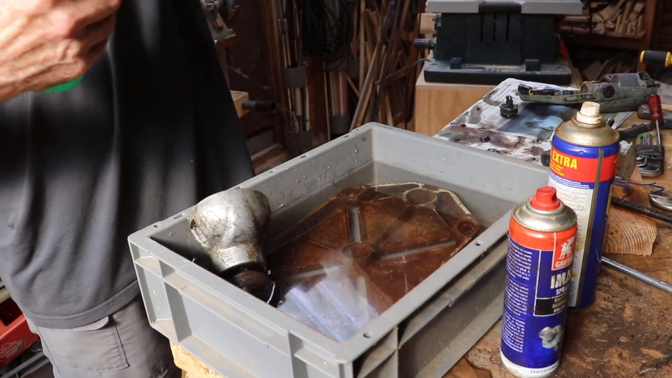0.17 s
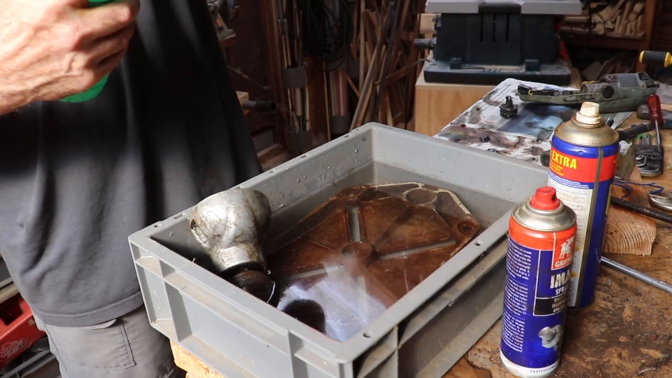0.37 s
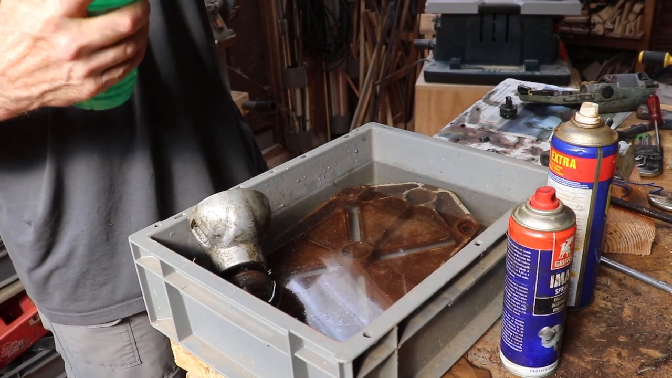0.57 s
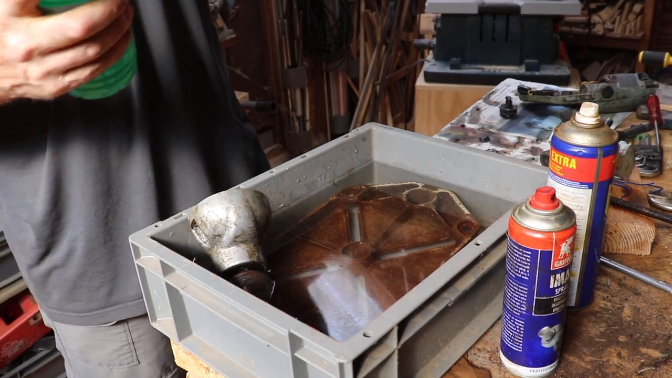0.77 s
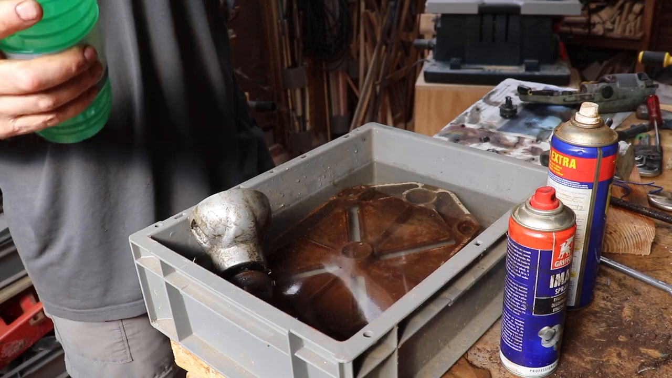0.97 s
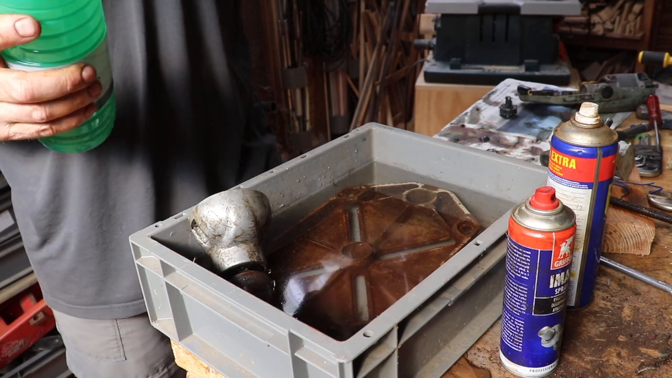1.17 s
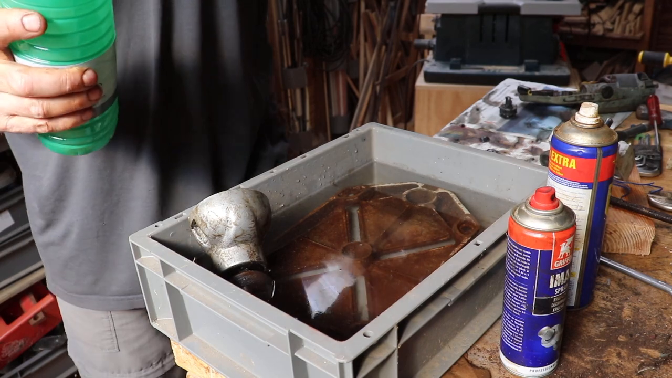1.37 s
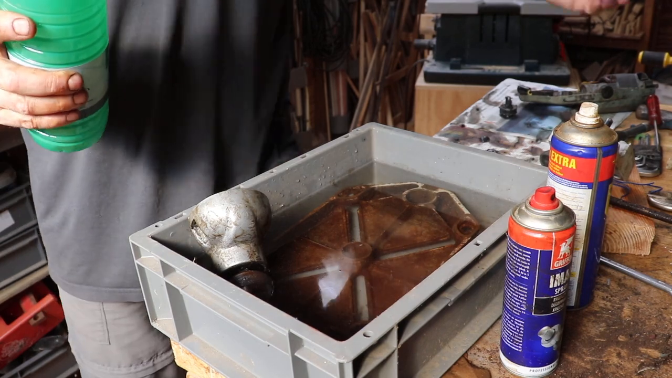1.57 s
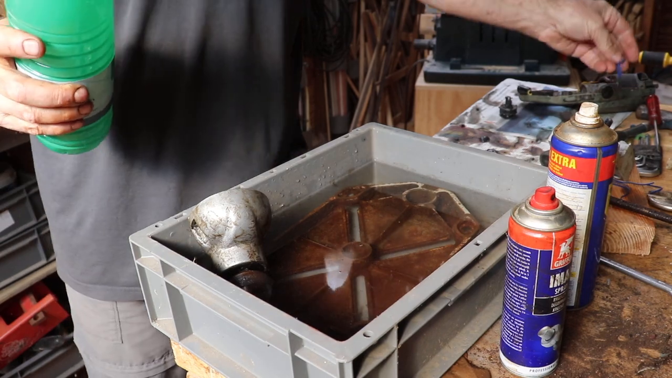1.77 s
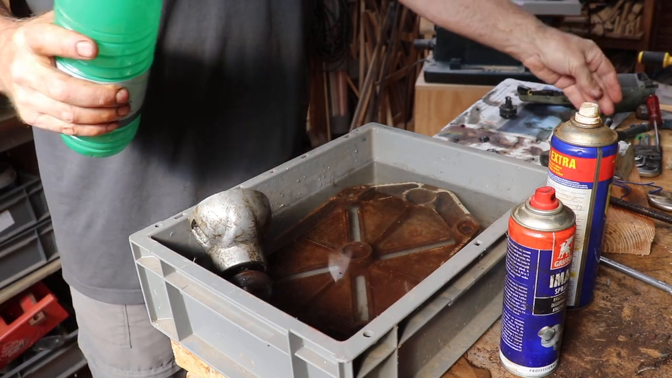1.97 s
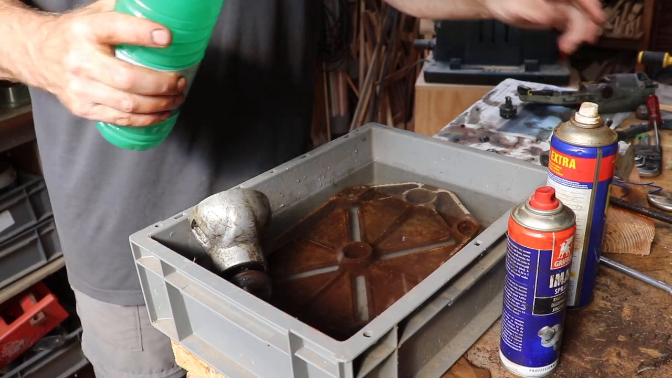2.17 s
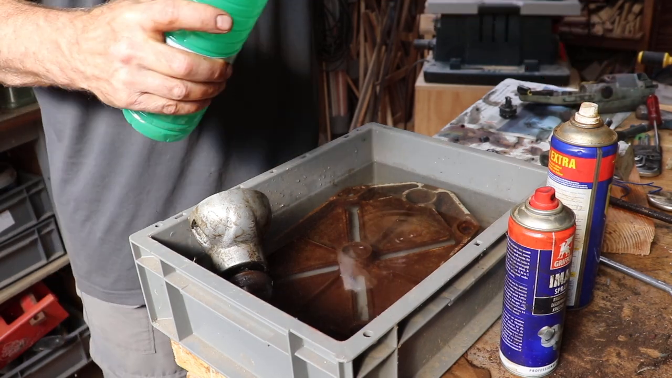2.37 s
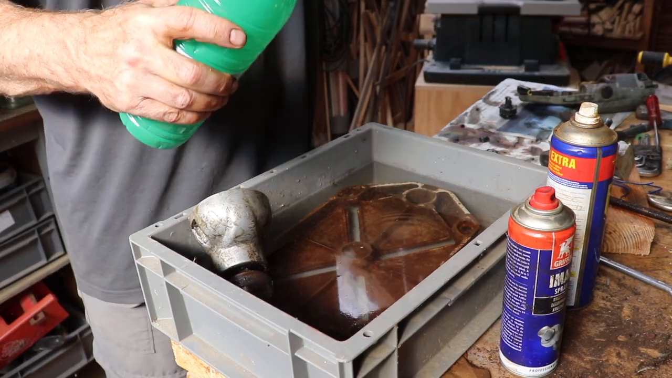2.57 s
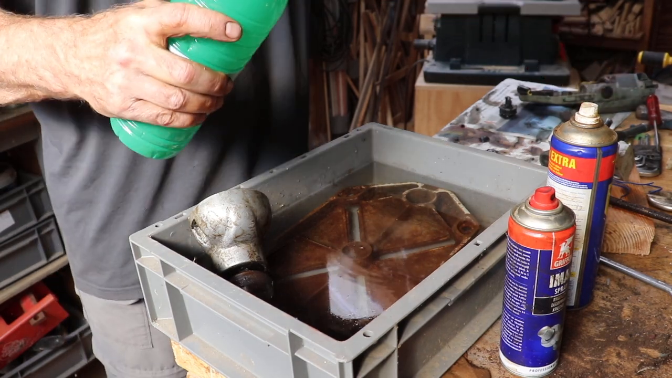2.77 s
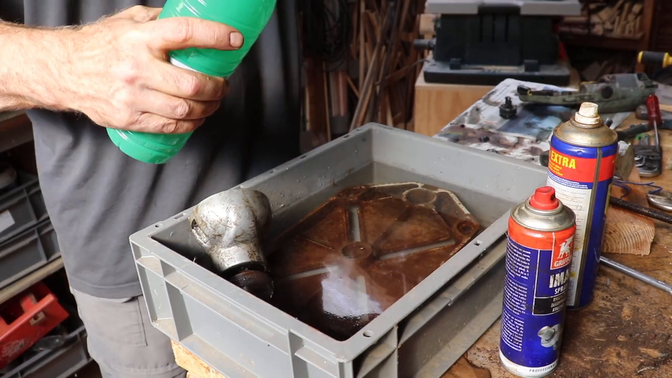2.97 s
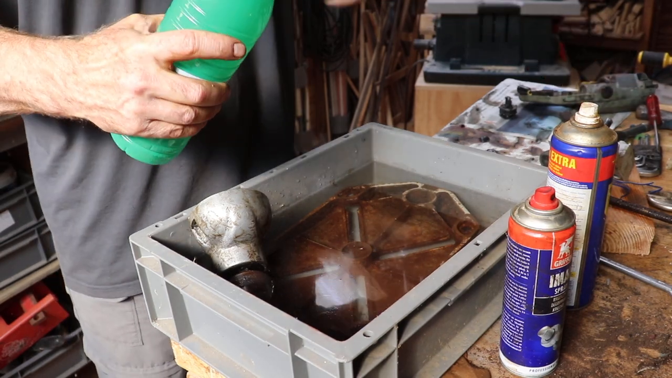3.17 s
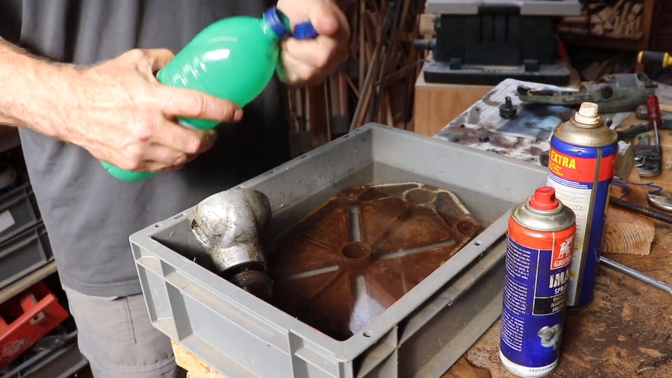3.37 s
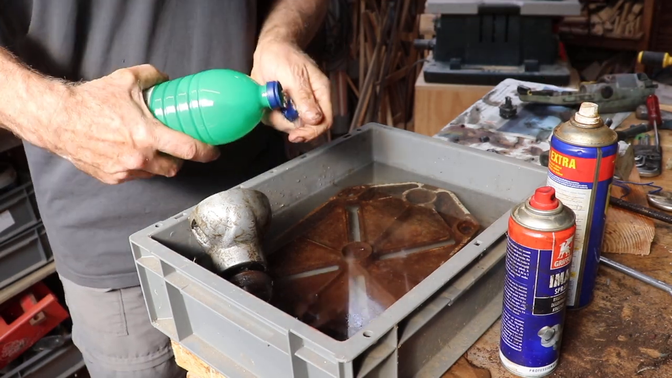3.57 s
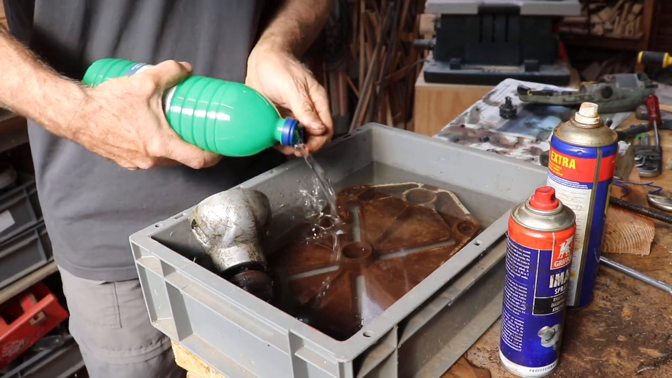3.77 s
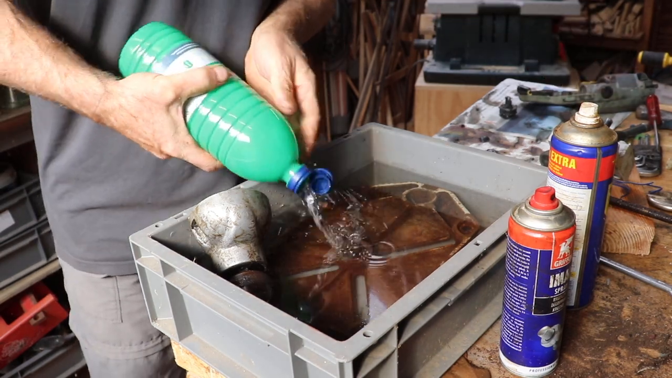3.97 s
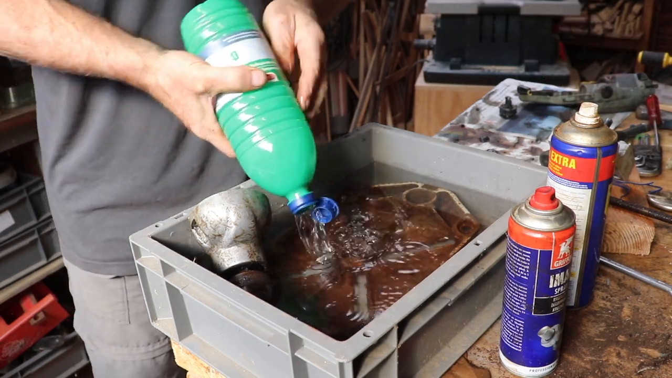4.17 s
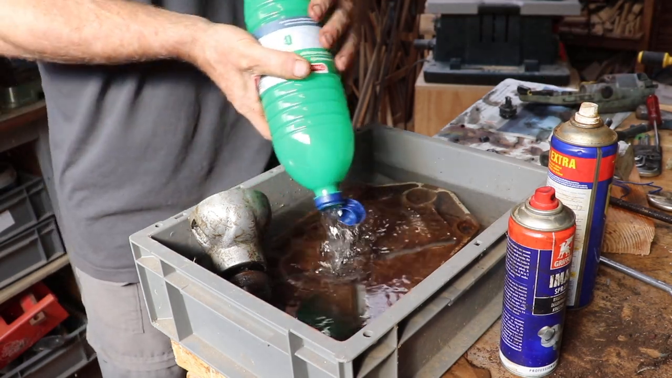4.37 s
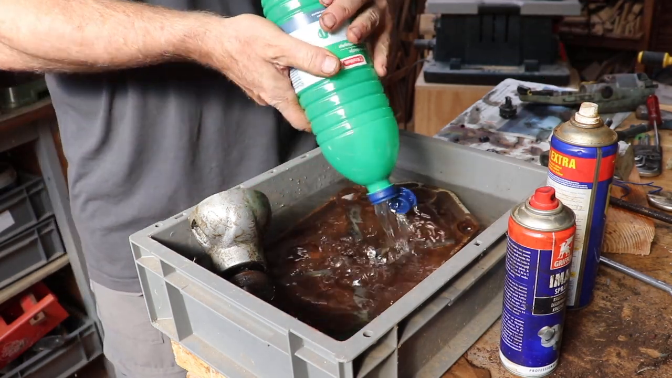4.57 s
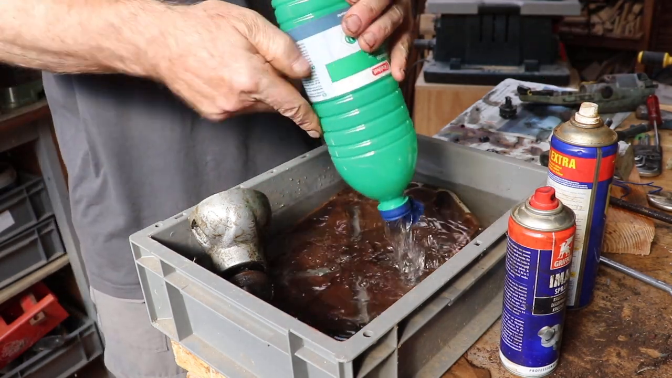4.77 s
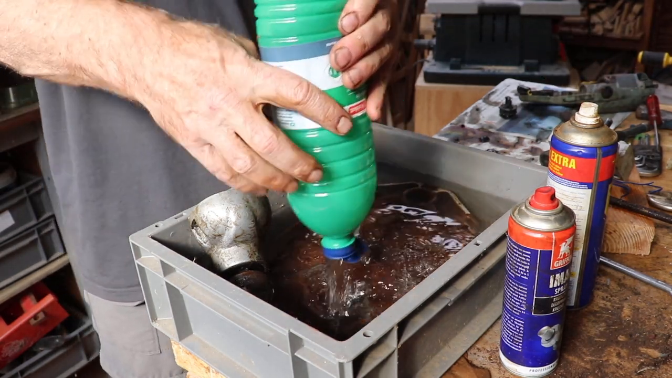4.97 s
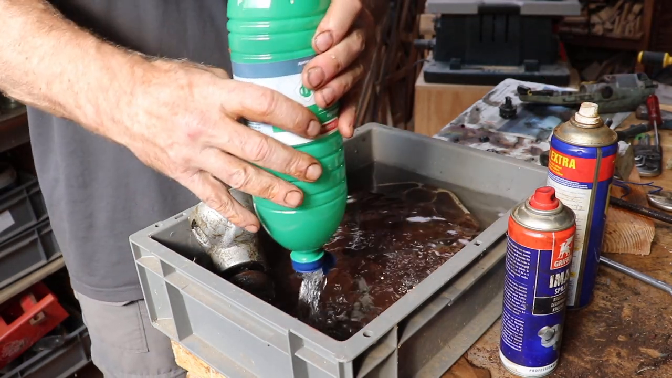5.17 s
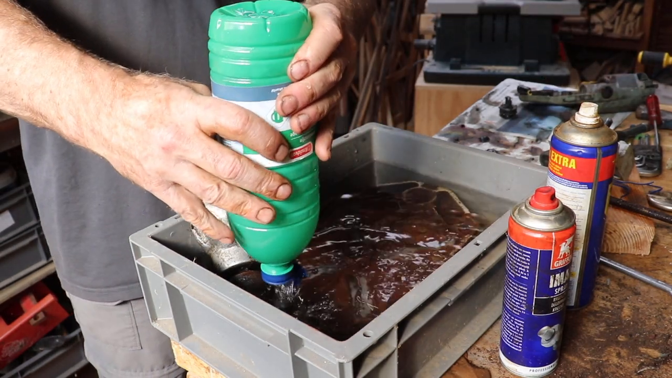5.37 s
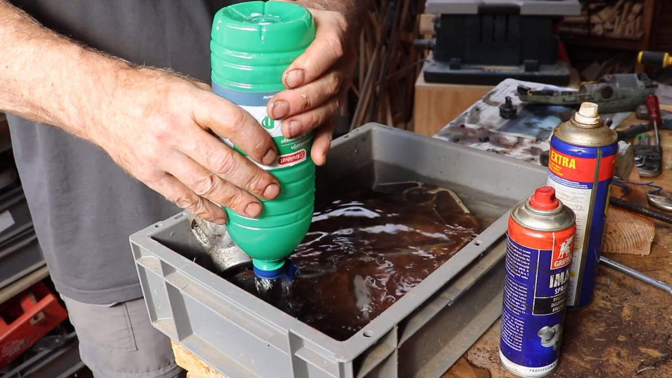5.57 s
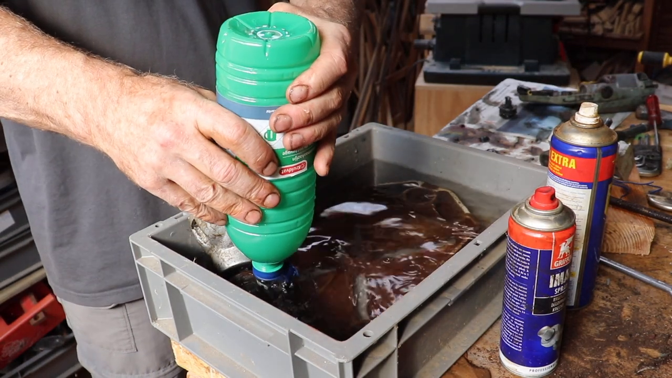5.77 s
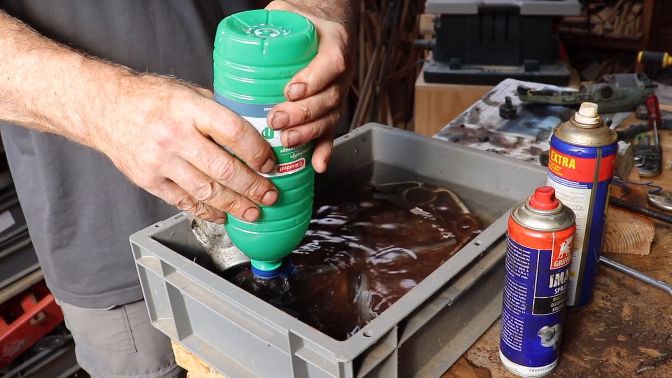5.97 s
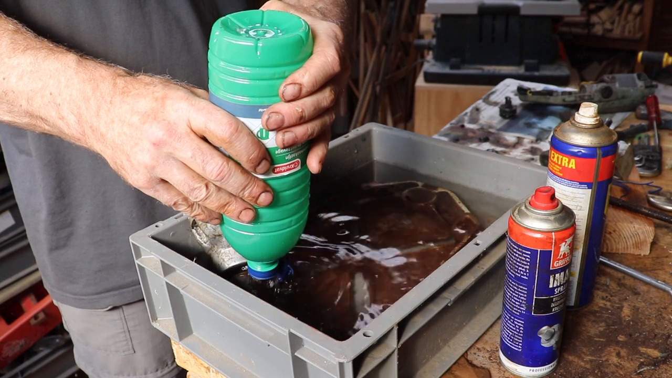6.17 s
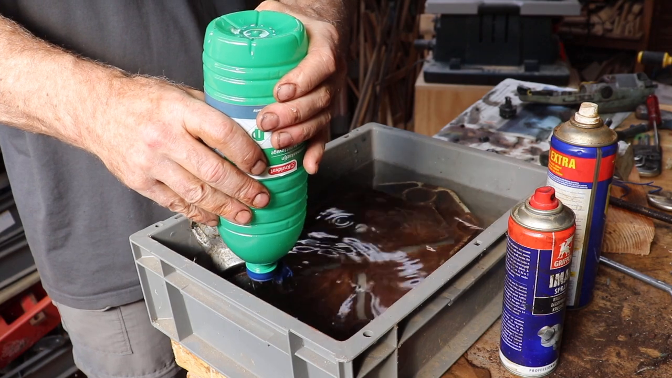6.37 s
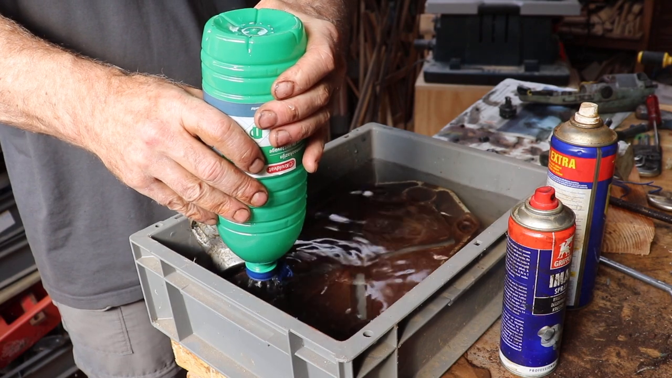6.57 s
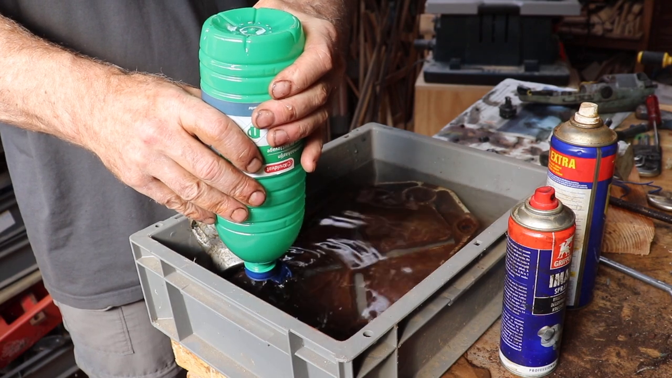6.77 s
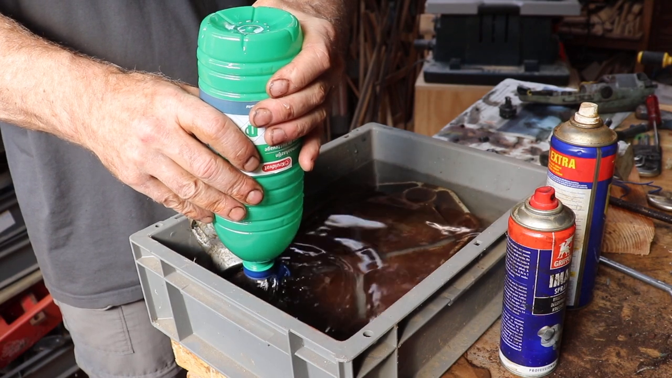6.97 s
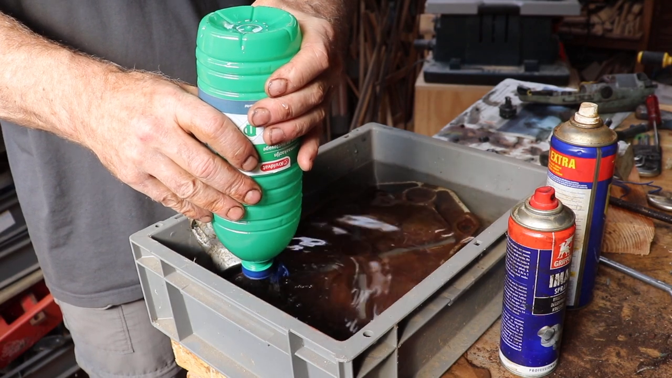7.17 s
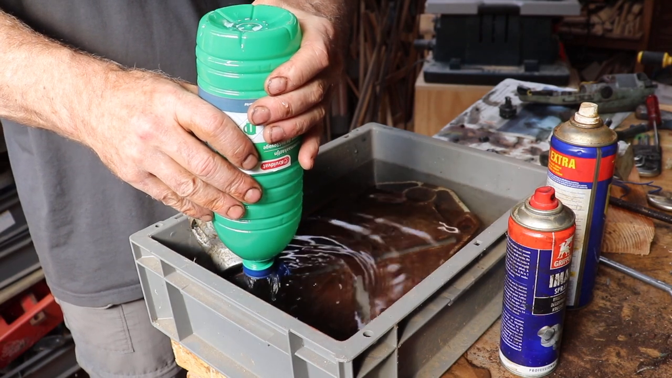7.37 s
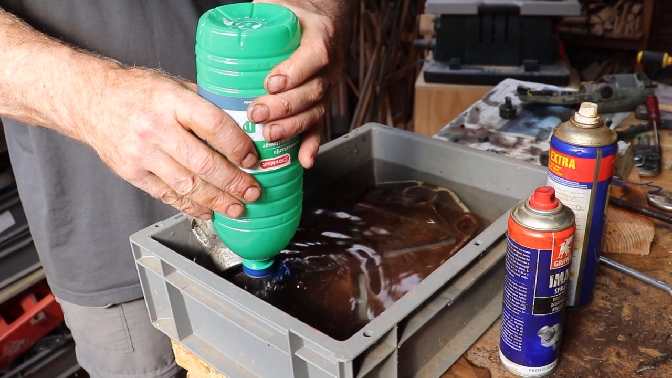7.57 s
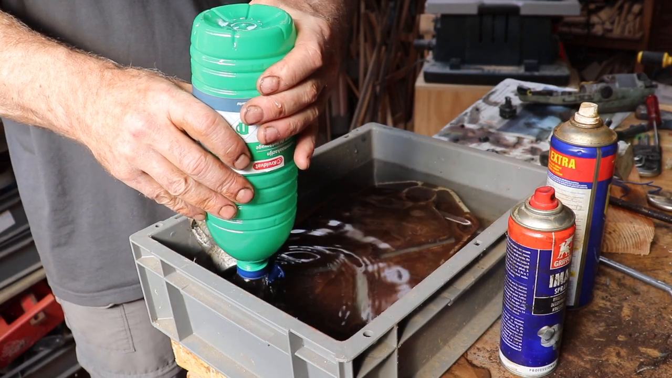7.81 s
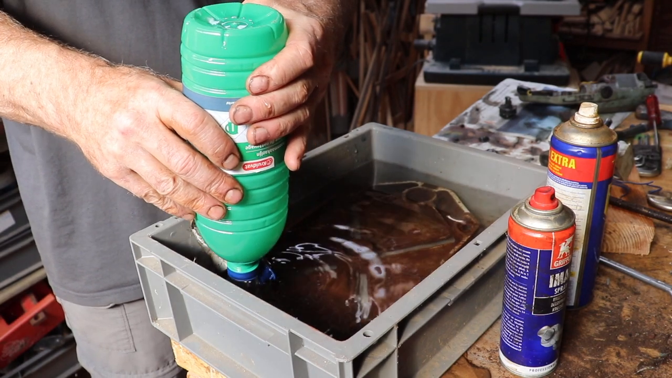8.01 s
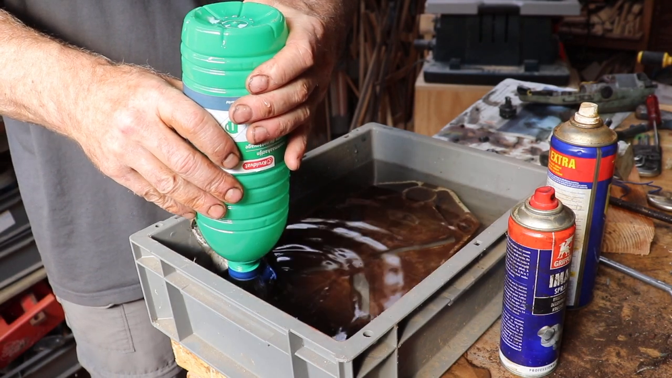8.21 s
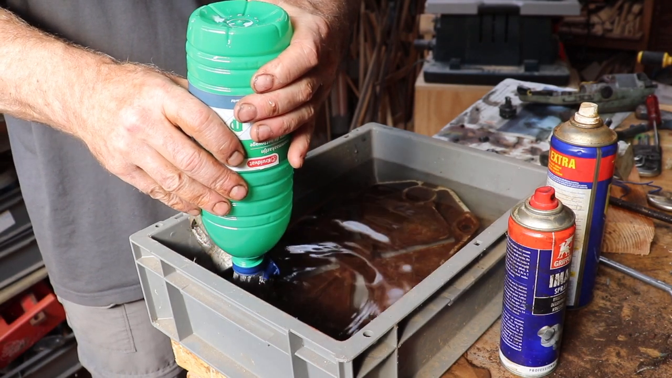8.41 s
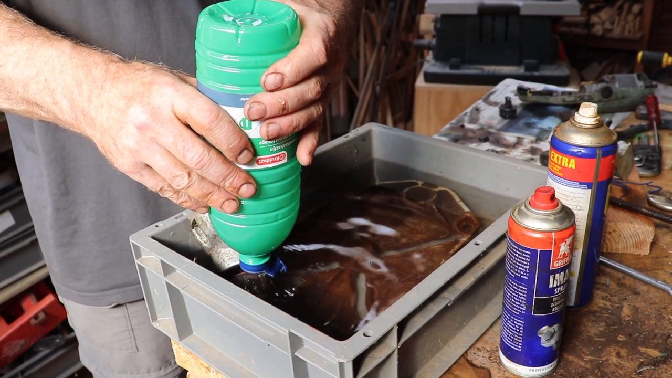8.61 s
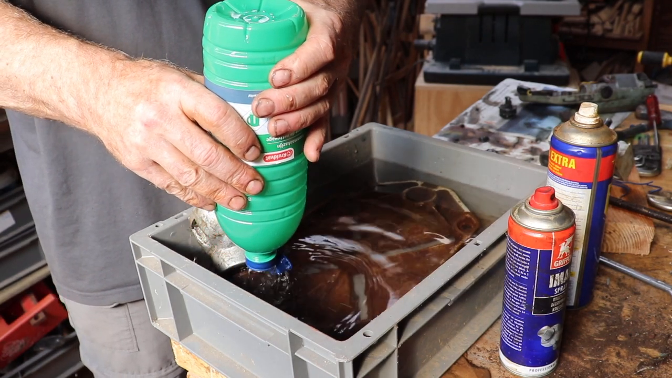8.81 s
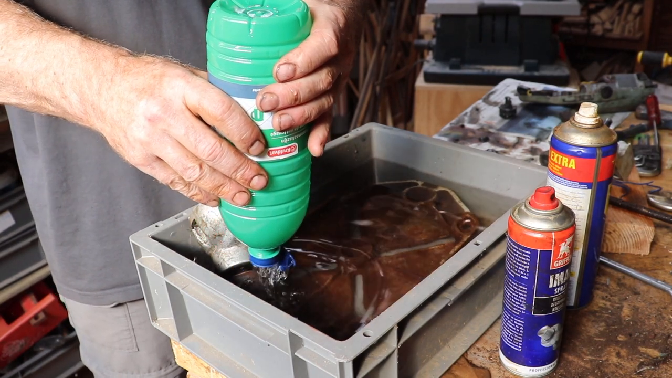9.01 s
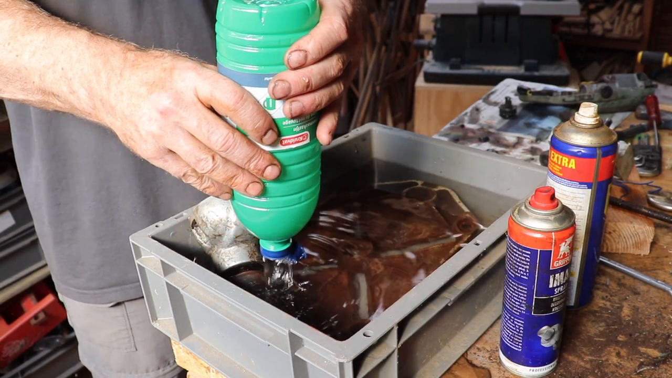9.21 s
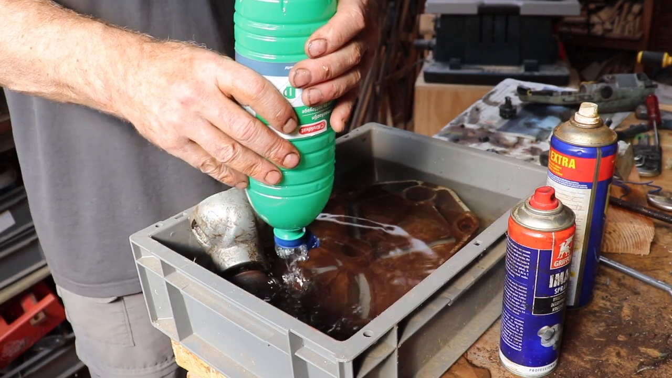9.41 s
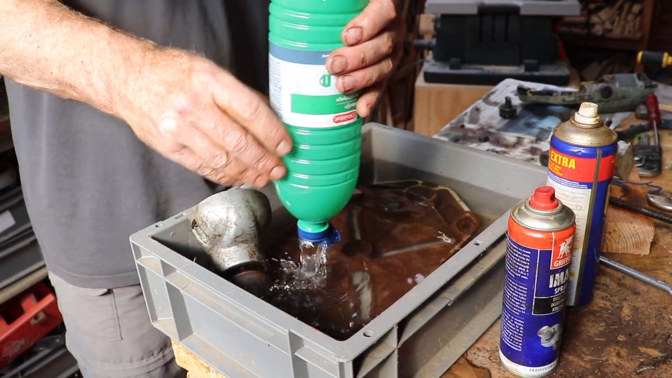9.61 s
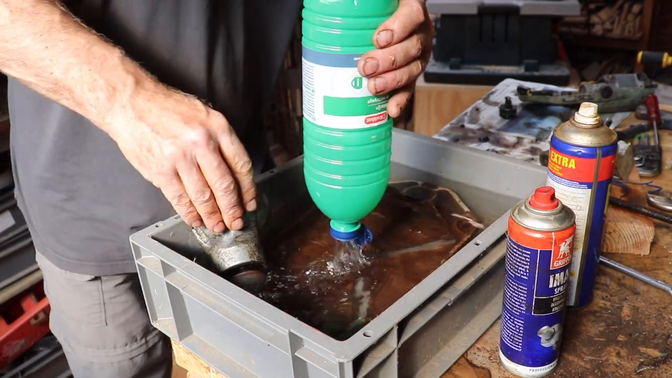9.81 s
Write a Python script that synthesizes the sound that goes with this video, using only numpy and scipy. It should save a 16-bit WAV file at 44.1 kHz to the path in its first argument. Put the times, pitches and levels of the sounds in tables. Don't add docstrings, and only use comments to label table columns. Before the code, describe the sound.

A close stereo microphone in a small workshop with short, quick reflections. From 0 to 1.3 s, feet shuffle softly and fingers rub a plastic bottle, with crisp creaks and clicks around 0.5-0.9 s, over faint air and distant low rumble. Near quiet follows, with slight handling ticks at 1.5-2.8 s. At 3.04 s the cap snaps open, very loud, dry and sharp. Small drips and rubs follow at 3.2-3.8 s. From about 3.8 s liquid pours into a pool in a crate: splashing, splats, fine droplet ticks and crowded bubbles, brightest at 4.2-5.4 s, with irregular hollow low gulps. At 5.75 s the neck strikes a hard part: one loud, bright, very short clack. The gurgling surges near 6.2 s, then becomes quieter and blubbery, thinning around 7.5 s, swelling near 8.2 s, and ebbing again. Splashing strengthens after 9.3 s and is still running at the end, about 9.8 s.

```python
import sys
import numpy as np
from scipy import signal
from scipy.fft import rfft, irfft, next_fast_len
from scipy.io import wavfile
from scipy.ndimage import uniform_filter1d, map_coordinates

SR = 44100
rng = np.random.default_rng(int(sys.argv[2]) if len(sys.argv) > 2 else 0)


def dump_mix(stems):
    frames = np.atleast_2d(stems).T
    limited = np.clip(frames, -1, 1)
    pcm = np.round(limited * 32767).astype(np.int16)
    wavfile.write(sys.argv[1], SR, pcm)


def gain_from_db(level_db):
    decades = np.asarray(level_db, float) / 20
    return 10 ** decades


N = 434385

# time in seconds, level in dB.
RUMBLE_LEVEL = [(0.0, -55), (0.6, -55), (2.0, -60.5), (4.58, -55), (9.85, -62)]
# time in seconds, level in dB.
FEET_LEVEL = [
    (0.0, -49),
    (0.91, -48.5),
    (1.3, -64),
    (3.8, -62),
]
# middle in seconds, half length in seconds, level in dB.
HAND_STROKES = [(0, 0.073, -45), (0.193, 0.26, -48), (0.55, 0.039, -59), (0.668, 0.048, -35.5),
                (1.566, 0.031, -50), (2.185, 0.22, -57.5), (2.57, 0.044, -47), (2.63, 0.07, -41.5),
                (2.729, 0.064, -43), (3.219, 0.024, -39.5), (3.598, 0.019, -44), (3.762, 0.029, -48.5)]
# frequency in Hz, density in dB per Hz.
RUMBLE_COLOUR = [(12, -28), (20, -7.5), (43, 5), (65, -2), (171, -5.5), (200, -5), (260, -33), (440, -120)]
AIR_COLOUR = [(88, 0), (150, -0.5), (385, 2), (496, -2), (679, -3.5), (1520, -9), (7580, -15),
              (15100, -23.5), (16300, -40)]
CLOTH_COLOUR = [(710, -36), (1200, -4), (1910, -13), (2480, 3.5), (3050, -1), (5410, -2.5), (7330, 0.5),
                (15000, -9.5), (16000, -32)]
FEET_COLOUR = [(76, -40), (130, -13), (263, -2), (324, -8), (441, -5), (1800, -17), (2340, -24),
               (3960, -120)]

# frequency in Hz, left-right likeness from 0 to 1.
PORT_LIKENESS = [(40, 0.95), (120, 0.9), (300, 0.93), (700, 0.65), (1500, 0.14), (4000, 0.015)]
# frequency in Hz, 60 dB decay time in seconds.
SHOP_DECAY = [(250, 0.26), (2000, 0.14), (6000, 0.19), (14000, 0.095)]
# delay in seconds, level in dB.
NEAR_ECHOES = [
    (.0013, -13),
    (.0031, -12),
    (.017, -24),
]
# frequency in Hz, left minus right in dB.
PORT_BALANCE = [(60, -3), (300, -0.5), (700, 2), (2400, -2), (8000, .5), (15000, 2.5)]

# start in seconds, peak in dB, thud in dB, snap in dB, left minus right in dB.
PLASTIC_CLICKS = [(0.453, -55, 27.5, 22.5, 3), (0.478, -31, -35, 0.5, 4), (0.603, -26.5, -21, -10, 4),
                  (0.644, -21.5, -11.5, 8, 1), (0.687, -29, -22, -20, 4), (0.914, -29, -13, -13, 7),
                  (1.545, -52, 13.5, -20, 6), (1.99, -57, 11, -20, 10), (2.565, -49.5, -20, 16, 1),
                  (2.801, -38, 18.5, -7, 3), (3.0377, -1, -24, -11, 0.5), (5.7525, -8, -22, -3.5, 1)]
# frequency in Hz, width in Hz, level in dB.
SHELL_MODES = [(800, 940, -6.5), (1680, 390, 3), (2260, 570, 3.5), (3020, 600, 1), (3800, 620, -4)]
HOLLOW_MODES = [(204, 320, -3), (340, 180, 3.5), (970, 450, 1), (2900, 16000, -11)]

# time in seconds, level in dB.
FLOW_LEVEL = [(3.78, -56.5), (3.97, -32), (4.35, -29), (4.73, -31), (4.92, -33), (5.3, -30.5), (5.6, -38),
              (5.87, -35.5), (6.25, -28), (6.44, -41), (6.82, -40), (7.1, -46.5), (7.58, -50), (8.1, -36.5),
              (8.7, -52), (9.1, -45), (9.29, -45), (9.67, -32)]
# time in seconds, spray over churn in dB.
SPRAY_OVER_CHURN = [(3.78, 17), (3.97, -6.5), (5.2, 0.5), (5.5, -8), (6.2, -12.5), (7.4, 4.5), (8.2, -11.5),
                    (8.6, 9), (9.7, -6.5)]
# frequency in Hz, density in dB per Hz.
CHURN_COLOUR = [(120, -47), (200, 21), (749, 19), (904, 16), (980, 6), (2350, -19), (5000, -30),
                (6500, -18), (11000, -120)]
SPRAY_COLOUR = [(1470, -8), (2500, -4.5), (4580, -12), (5970, -13), (11700, -10), (15200, -24),
                (16000, -51)]

# start in seconds, peak in dB.
SPLAT_DROPS = [(3.215, -30), (3.362, -32.5), (3.813, -25), (3.908, -21.5), (4.276, -27), (4.332, -25),
               (4.357, -15), (4.475, -17), (4.616, -21), (4.69, -20), (5.28, -26), (5.371, -18.5),
               (5.469, -29), (6.571, -26), (7.241, -25), (7.489, -31), (8.212, -21.5), (8.315, -27.5),
               (8.501, -18), (9.079, -24.5), (9.247, -31), (9.364, -27), (9.407, -22)]
# start in seconds, peak in dB, frequency in Hz.
RISING_CAVITIES = [
    (4.173, -44, 1002),
    (4.202, -35, 2240),
    (4.214, -40, 1650),
    (4.219, -40, 2240),
    (4.4, -37, 992),
]
# start in seconds, peak in dB, frequency in Hz.
NECK_STRIKES = [
    (5.75, -1, 3130),
    (5.7519, 2, 4400),
]
# start in
# seconds, peak in dB, frequency in Hz.
LONE_BUBBLES = [(4.213, -32.5, 680), (4.239, -29, 1460), (4.266, -29.5, 659), (4.416, -19, 1680),
                (4.475, -35, 556), (4.62, -24, 1153), (4.635, -34, 1400), (4.699, -28.5, 590),
                (4.774, -25.5, 1470), (5.108, -27, 1240), (5.467, -28, 780), (5.639, -23.5, 744),
                (6.182, -20.5, 1130), (6.204, -23, 945), (6.205, -25, 1540), (6.231, -19, 1300),
                (6.237, -28, 513), (6.33, -28, 1420), (6.54, -29, 1520), (6.54, -26.5, 689),
                (6.699, -24, 1405), (6.963, -30, 543), (6.971, -25.5, 870), (7.243, -33, 776),
                (7.504, -31.5, 1360), (7.749, -24.5, 940), (8.043, -26, 1370), (8.334, -34.5, 940),
                (8.403, -27.5, 1385), (8.585, -33, 490), (8.816, -35, 1436), (8.903, -24, 866),
                (8.956, -32, 1050), (9.044, -29, 830), (9.091, -34, 664), (9.091, -27, 1350),
                (9.359, -27, 1570), (9.505, -29.5, 1340), (9.67, -24.5, 896), (9.745, -33, 880),
                (4.419, -21, 2520), (4.424, -21.5, 3600), (4.619, -15, 2900), (4.695, -16.5, 3380),
                (4.696, -18, 1970), (4.711, -19, 2040), (4.711, -14, 3200), (4.719, -20, 3200),
                (4.86, -20.5, 2680), (5.231, -20.5, 3360), (5.333, -24, 3200), (5.47, -24.5, 2400),
                (5.577, -26.5, 1860), (5.639, -26, 3120), (5.856, -21, 3730), (6.275, -27.5, 3640),
                (6.278, -21.5, 2670), (6.572, -27, 2370), (6.682, -27, 1920), (6.819, -27, 3720),
                (6.883, -21.5, 2000), (6.912, -23, 3330), (6.964, -29, 2500), (7.074, -27, 2240),
                (7.301, -32, 2200), (7.421, -31, 3750), (7.58, -32, 3800), (7.708, -29, 1970),
                (7.708, -25.5, 3700), (7.739, -25, 3760), (7.743, -20, 1940), (7.862, -28, 2020),
                (8.067, -25, 2620), (8.085, -27.5, 2550), (8.231, -28, 2350), (8.404, -29.5, 2000),
                (8.458, -27, 2960), (8.501, -27, 4030), (8.545, -26, 3450), (8.548, -26, 1950),
                (8.825, -30, 3020), (9.042, -23, 3930), (9.09, -27, 1940), (9.373, -26, 3470),
                (9.611, -22.5, 2900), (9.668, -24.5, 3300), (9.764, -25, 4200),
                (4.164, -26, 4180), (4.242, -17.5, 7000), (4.276, -24, 8960), (4.332, -16, 5670),
                 (4.357, -20, 5000), (4.358, -18, 8500), (4.37, -22, 5950), (4.484, -17.5, 4800),
                 (4.665, -19, 4300), (4.686, -24, 9000), (4.693, -19, 5100), (4.993, -19, 6200),
                 (5.113, -20, 9000), (5.191, -24, 6050), (5.281, -18, 9900), (5.846, -22, 5900),
                 (5.868, -24, 9100), (6.403, -31.5, 9400), (6.739, -26, 5900), (6.755, -29, 6100),
                 (7.206, -27, 8400), (7.513, -22, 10800), (7.758, -27, 9050), (7.863, -28, 8660),
                 (8.216, -30, 9700), (8.545, -20, 6100), (8.667, -26, 10200), (8.882, -24, 8300),
                 (9.033, -22, 5700), (9.088, -28, 6500), (9.126, -25, 4300), (9.256, -23, 7300),
                 (9.362, -22, 8750), (9.373, -24, 5730), (9.592, -26, 10100),
                (3.953, -26, 2960), (4.098, -29, 1000), (4.163, -24, 2460), (4.542, -23.5, 3070),
                 (4.593, -28, 2900), (4.771, -24.5, 2640), (4.797, -24, 3700), (5.073, -22.5, 3270),
                 (5.109, -20.5, 3670), (5.154, -26, 2100), (5.172, -25, 5250), (5.391, -29, 3140),
                 (6.733, -27.5, 1940), (7.217, -39, 2250), (7.386, -34, 5630), (7.999, -29.5, 2830),
                 (8.983, -34, 1500), (9.011, -31, 1940), (9.13, -30, 1220), (7.297, -38.5, 1320),
                 (9.302, -39, 1290), (8.041, -34, 2740), (9.079, -27, 2700)]
# start in seconds, peak in dB, frequency in Hz.
BOTTLE_DRIPS = [
    (2.056, -49, 1370),
    (3.207, -41, 785),
    (3.215, -32, 3480),
    (3.362, -35, 2370),
    (3.362, -41.5, 766),
    (3.828, -34, 2730),
    (3.858, -34.5, 1980),
    (3.73, -42.5, 2900),
    (3.753, -45, 1340),
]
# start in seconds, peak in dB, frequency in Hz.
LARGE_POCKETS = [(4.18, -29.5, 1134), (4.709, -24, 1490), (4.858, -23, 1047), (5.105, -28.5, 820),
                 (5.28, -27.5, 920), (5.322, -21.5, 836), (5.429, -18, 1180), (5.654, -27.5, 1034),
                 (5.888, -22, 951), (5.967, -20, 1240), (5.998, -21.5, 1030), (6.018, -19.5, 871),
                 (6.222, -21.5, 1610), (6.55, -29, 744), (6.708, -24.5, 1254), (6.765, -19.5, 977),
                 (6.957, -24.5, 1280), (7.114, -26.5, 1460), (7.13, -26.5, 1080), (7.707, -30, 1180),
                 (7.735, -23.5, 1035), (7.751, -25, 1310), (7.864, -23, 1375), (7.958, -29, 1350),
                 (8.27, -19.5, 1190), (8.403, -27.5, 810), (8.598, -26.5, 1056), (8.892, -30.5, 893),
                 (9.589, -19.5, 1680), (9.746, -23, 1404)]
# start in seconds, peak in dB, frequency in Hz.
MIDDLING_BUBBLES = [(9.152, -29.5, 2450), (3.907, -29.5, 2300), (4.201, -28, 1860), (4.246, -23.5, 2380),
                    (4.276, -22.5, 1710), (4.417, -29, 1920), (4.47, -26, 1760), (4.693, -17.5, 2660),
                    (4.802, -21.5, 2450), (4.86, -20.5, 1830), (4.991, -20, 2820), (5.112, -17, 2320),
                    (5.212, -24, 1680), (6.05, -28.5, 2330), (6.146, -26.5, 1970), (6.208, -20, 1786),
                    (6.811, -23.5, 2430), (6.852, -17, 1886), (6.911, -21, 2050), (6.971, -23, 2010),
                    (7.322, -29, 2710), (7.662, -25.5, 2130), (7.756, -15, 2030), (8.064, -29.5, 2000),
                    (8.589, -19.5, 1980), (8.818, -26.5, 1960), (8.998, -25.5, 2830), (9.041, -22.5, 1960),
                    (9.371, -29, 2180), (9.611, -19.5, 1710)]
# start in seconds, peak in dB, frequency in Hz.
SMALL_BEADS = [(8.208, -28, 3980), (9.161, -27, 4460), (3.921, -24.5, 3300), (3.98, -20, 4870),
               (4.278, -19, 5940), (4.356, -18, 6170), (4.472, -17.5, 3550), (4.473, -17, 4830),
               (4.622, -18, 3510), (4.643, -22.5, 3230), (4.687, -18.5, 5860), (5.112, -22, 6000),
               (5.33, -23.5, 5550), (5.469, -23.5, 5800), (5.538, -25, 3000), (5.841, -25, 4000),
               (7.501, -23.5, 3970), (7.55, -29, 3870), (7.708, -24, 4760), (7.756, -23, 3060),
               (8.141, -26.5, 3800), (8.316, -27.5, 3480), (8.456, -29, 3750), (8.501, -31, 2880),
               (8.628, -28, 4880), (8.672, -27, 3650), (8.948, -26.5, 3110), (9.037, -31, 4040),
               (9.081, -23.5, 5260), (9.663, -26, 4460)]
# start in seconds, peak in dB, frequency in Hz.
AIR_GULPS = [(3.885, -48.5, 363), (4.145, -45, 307), (4.246, -43.5, 331), (4.479, -43, 334),
             (4.59, -42, 337), (4.687, -36.5, 274), (4.747, -44, 332), (5.426, -44.5, 324),
             (5.576, -42.5, 318), (5.652, -39.5, 263), (5.869, -42, 263), (5.968, -41.5, 328),
             (6.373, -45.5, 342), (6.512, -43.5, 316), (6.681, -44, 317), (6.763, -44.5, 251),
             (6.849, -42.5, 326), (7.074, -42.5, 337), (7.352, -43, 333), (7.659, -42, 353),
             (7.865, -44, 333), (8.185, -43.5, 320), (8.547, -43.5, 340), (8.818, -38.5, 299),
             (9.013, -44.5, 282), (9.097, -45, 261), (9.372, -41.5, 259), (9.565, -40.5, 315),
             (9.75, -43, 306)]
# start in seconds, peak in dB, frequency in Hz.
AIR_SIPS = [(3.922, -38, 480), (4.835, -36.5, 453), (4.992, -45, 420), (5.153, -47, 476),
            (5.321, -43.5, 438), (5.752, -38, 552), (6.152, -41, 448), (6.925, -43, 435), (7.217, -45, 393),
            (7.499, -47, 505), (7.957, -41, 413), (8.064, -38.5, 422), (8.272, -48.5, 462),
            (8.412, -39.5, 438), (8.733, -48, 474), (8.894, -43.5, 472), (9.253, -45.5, 434)]
# start in seconds, peak in dB, frequency in Hz.
POOL_HEAVES = [
    (6.023, -40, 195),
    (6.19, -36.5, 207),
    (8.591, -38.5, 220),
]


def unit(x):
    return x / np.sqrt(np.mean(x ** 2) + 1e-20)


def along(points, hz):
    f, v = np.transpose(points)
    return np.interp(np.log(hz + 1), np.log(f + 1), v)


def curve(rows):
    s, db = np.transpose(rows)
    return np.interp(np.arange(N) / SR, s, db, left=-120)


def filtered(x, response):
    m = next_fast_len(x.shape[-1] + 8192)
    spectrum = rfft(x, m) * response(np.fft.rfftfreq(m, 1 / SR))
    return irfft(spectrum, m)[..., :x.shape[-1]]


def resonances(modes):
    def response(f):
        total = 0
        for k, (centre, width, db) in enumerate(modes):
            damping = 1j * f * width
            total = total + (-1) ** k * gain_from_db(db) * damping / (centre * centre - f * f + damping)
        return total
    return response


def rush(colour, patchy_db):
    z = signal.stft(rng.standard_normal((2, N)), nperseg=256)[2]
    patches = uniform_filter1d(rng.standard_normal(z.shape[1:]), 5, 0)
    patches = unit(uniform_filter1d(patches, 8, 1))
    pair = signal.istft(z * gain_from_db(patchy_db * patches), nperseg=256)[1][:, :N]

    def mid_side(hz):
        turn = np.arccos(np.clip(along(PORT_LIKENESS, hz), -1, 1)) / 2
        return gain_from_db(along(colour, hz)) * [np.cos(turn), np.sin(turn)]

    mid, side = filtered(pair, mid_side)
    return unit(np.array([mid + side, mid - side]))


def rings(s, db, hz, t60, rise, attack, size):
    t = np.arange(size) / SR
    shape = np.shape(s)
    s, db, hz, t60, rise = (np.broadcast_to(v, shape)[:, None] for v in (s, db, hz, t60, rise))
    sway_hz = hz * (.05 + .07 * rng.random(s.shape))
    sway_start = 2 * np.pi * rng.random(s.shape)
    phase = 2 * np.pi * hz * t * (1 + rise * (t / t60 - .15))
    phase = phase + 0.7 * np.sin(2 * np.pi * sway_hz * t + sway_start)
    envelope = gain_from_db(db - 60 * t / t60) * (1 - np.exp(-t * hz / attack))
    wave = envelope * np.sin(phase)
    at = np.round(s * SR).astype(int) + np.arange(size)
    return np.bincount(at.ravel(), wave.ravel(), N + size)[:N]


def slaps(s, db, hz, width_hz, t60):
    t = np.arange(500) / SR
    burst = gain_from_db(db[:, None] - 60 * t / t60) * rng.standard_normal((len(s), len(t)))
    at = np.round(s * SR).astype(int)[:, None] + np.arange(len(t))
    noise = np.bincount(at.ravel(), burst.ravel(), N + len(t))[:N]
    broad = resonances([(hz, 1.5 * width_hz, 0)])
    return filtered(noise, lambda f: broad(f) ** 2)


def background():
    t = np.arange(N) / SR
    strokes = sum(gain_from_db(db) * np.clip(1 - ((t - s) / half) ** 2, 0, 1) ** 2 for s, half, db in HAND_STROKES)
    catch = map_coordinates(rng.standard_normal(N // 100), [t * 110])
    hands = strokes * gain_from_db(5.5 * catch - 2) * rush(CLOTH_COLOUR, patchy_db=1.5)
    feet = gain_from_db(curve(FEET_LEVEL) - 1.5) * rush(FEET_COLOUR, patchy_db=1.5)
    far = gain_from_db(curve(RUMBLE_LEVEL)) * rush(RUMBLE_COLOUR, patchy_db=1.5)
    air = gain_from_db(-50.0 - 3.6 * np.clip(t - 5, 0, 1)) * rush(AIR_COLOUR, patchy_db=1.5)
    return hands + feet + far + air


def shop(x, wet_db):
    out, step = np.zeros((2, N + SR)), 13230
    for k, (s, db) in enumerate(NEAR_ECHOES):
        for side in (0, 1):
            delay = round(s * SR) + 3 * ((k + side) % 2)
            out[side, delay:][:N] += gain_from_db(db) * x[side]
    for start in range(0, N, step):
        hz, t, z = signal.stft(rng.standard_normal((2, SR // 3)), SR, nperseg=256)
        decay = gain_from_db(-60 * t / along(SHOP_DECAY, hz)[:, None])
        tail = signal.istft(z * decay, SR, nperseg=256)[1]
        tail = tail + filtered(tail[::-1], lambda f: .9 * along(PORT_LIKENESS, f))
        tail = tail / np.linalg.norm(tail[0])
        wet = signal.fftconvolve(x[:, start:start + step], tail, axes=1)
        out[:, start + 200:][:, :wet.shape[1]] += gain_from_db(wet_db) * wet
    return out[:, :N]


def plastic_clicks():
    out, t = np.zeros((2, N + SR)), np.arange(6000) / SR
    shell_response, hollow = resonances(SHELL_MODES), resonances(HOLLOW_MODES)
    bright = resonances([(4200, 1700, 0), (10500, 4000, -2)])

    def dull(hz):
        return hollow(hz) / (1 + 1j * hz / 2600) ** 2

    def peak(x):
        return x / np.abs(x).max()

    for s, db, thud_db, snap_db, pan_db in PLASTIC_CLICKS:
        burst = rng.standard_normal((3, len(t))) * gain_from_db(-60 * t / [[.017], [.13], [.009]])
        burst[0, 20] += 22
        shell = gain_from_db(1.0) * peak(filtered(burst[0], shell_response))
        thud = gain_from_db(thud_db) * peak(filtered(burst[1], dull))
        snap = gain_from_db(snap_db) * peak(filtered(burst[2], bright))
        level = gain_from_db(db + pan_db * np.array([[.5], [-.5]]))
        out[:, round(s * SR):][:, :len(t)] += level * (shell + thud + snap)
    return out[:, :N]


def lull():
    events = AIR_GULPS + AIR_SIPS + LARGE_POCKETS + MIDDLING_BUBBLES + SMALL_BEADS
    stirred = np.sort([0] + [row[0] for row in events])
    t = np.arange(N) / SR
    since = t - stirred[np.searchsorted(stirred, t, side="right") - 1]
    calm_db, calm_s = 4, 0.03
    return uniform_filter1d(-calm_db * (1 - np.exp(-since / calm_s)), size=600)


def swarm(level_db, centre_hz, spread, cycles, scatter_db, count, size):
    u, g = rng.random((count, 3)), rng.standard_normal((count, 2))
    hz = np.clip(centre_hz * np.exp(spread * g[:, 0]), 200, 15000)
    t60 = np.minimum(cycles * np.exp(0.395 * g[:, 1]) / hz, size / SR)
    first_s = FLOW_LEVEL[0][0]
    s = first_s + u[:, 0] * (N / SR - first_s - .001)
    db = -scatter_db * np.log(u[:, 1] + .01)
    rise = 1.6 * u[:, 2] ** 1.5 - .1
    x = rings(s, db, hz, t60, rise, 3, size)
    return gain_from_db(level_db) * x / np.std(x[round(first_s * SR):])


def stream():
    churn_db = curve(FLOW_LEVEL)
    spray_db = churn_db + curve(SPRAY_OVER_CHURN)
    waver = map_coordinates(rng.standard_normal(300), [np.arange(N) * 22 / SR])
    surge_db = 4 + lull() + 3 * waver
    spots = [swarm(churn_db + surge_db - 4, 2000, .5, 66, 3, count=3200, size=1500) for side in (0, 1)]
    drops = [swarm(spray_db + surge_db - 4, 7000, .45, 20, 4, count=1800, size=350) for side in (0, 1)]
    near = np.array([[0.27, 0.28], [0.037, 0.48]]) @ spots
    near = near + np.array([[0.65, 0.27], [0.094, 0.76]]) @ drops
    hiss = gain_from_db(churn_db + surge_db - 19) * rush(CHURN_COLOUR, patchy_db=3)
    hiss = hiss + gain_from_db(spray_db + 1.9 * surge_db - 14) * rush(SPRAY_COLOUR, patchy_db=2)
    return near, hiss


def splats():
    s, db = np.transpose(SPLAT_DROPS)
    hz = 6000 + 5000 * rng.random(len(s)) ** 2
    crack = slaps(s, db + 3, 6500, 9000, .0022)
    return crack + rings(s, db - 6, hz, 30 / hz, .2, .5, size=300)


def sweeps_and_strikes():
    s, db, hz = np.transpose(RISING_CAVITIES)
    glides = rings(s, db + 4.5, hz, 130 / hz ** 0.95, .7, 10, size=5000)
    s, db, hz = np.transpose(NECK_STRIKES)
    return glides + rings(s, db, hz, 0.0017, -0.16, .1, size=600)


def froth():
    s, db, hz = np.transpose(LONE_BUBBLES)
    u = rng.random((len(s), 2))
    cycles = (55 + 4 * np.log2(hz / 1000)) * (0.51 + 0.56 * u[:, 0])
    notes = rings(s, db - 2.5, hz, cycles / hz, .35 * u[:, 1], 0.5, size=3000)
    return notes + slaps(s, db - 10.5, 3500, 5000, .005)


def bubbles():
    s, db, hz = np.transpose(BOTTLE_DRIPS + LARGE_POCKETS + MIDDLING_BUBBLES + SMALL_BEADS)
    u, g = rng.random((len(s), 7)), rng.standard_normal((len(s), 6))
    cycles = (58 - 3 * np.log2(hz / 1000)) * (0.71 + 0.58 * u[:, 6])
    out = rings(s, db - 1.0, hz, cycles / hz, 0.173, 1.0, size=4000)
    snap_db = db + 3 * np.log2(hz / 1700)
    out += rings(s, snap_db, 1.064 * hz, 13 / hz, 0.33, 0.067, size=1000)
    out += slaps(s, db - 8, 2500, 4000, .004)
    for k in range(6):
        young_s = s + .11 * u[:, k] ** 1.3
        young_db = db - 10 - 13 * u[:, k]
        young_hz = np.clip(hz * np.exp(0.072 + 0.33 * g[:, k]), 400, 9000)
        out += rings(young_s, young_db, young_hz, 50 / young_hz, .2 + .2 * g[:, k - 1], 2, size=1500)
    return out


def glugs():
    s, db, hz = np.transpose(AIR_GULPS + AIR_SIPS + POOL_HEAVES)
    pocket = rings(s, db + 10.5, hz, 0.057, 0.091, 0.45, size=6000)
    return pocket + slaps(s, db + 21.0, 680, 1260, 0.018)


def scene():
    near, hiss = stream()
    pool = gain_from_db(4.5) * (glugs() + bubbles() + froth() + splats() + sweeps_and_strikes())

    def lead(hz):
        low_cut = hz ** 2 / (hz ** 2 + 130 ** 2)
        return low_cut * np.exp(2j * np.pi * hz * np.array([[1], [-1]]) * 1.1e-5)

    water = filtered(np.array([pool, pool]) + near, lead)
    plastic = plastic_clicks()
    room = shop(gain_from_db(-2.0) * water + plastic, wet_db=-4.0)
    return water + plastic + room + hiss + background()


def low_pass(x):
    return signal.sosfilt(signal.butter(12, 16670, fs=SR, output="sos"), x)


def record(dry):
    def microphone(hz):
        top_db = along([(11000, 1.5), (15500, 1.0), (16300, -24)], hz)
        return gain_from_db(top_db + along(PORT_BALANCE, hz) * np.array([[.5], [-.5]]))

    x = filtered(dry, microphone)
    x = x / (1 + np.abs(x / .95) ** 6) ** (1 / 6)
    return low_pass(x)


dry = scene()
out = record(dry)
dump_mix(out)
```